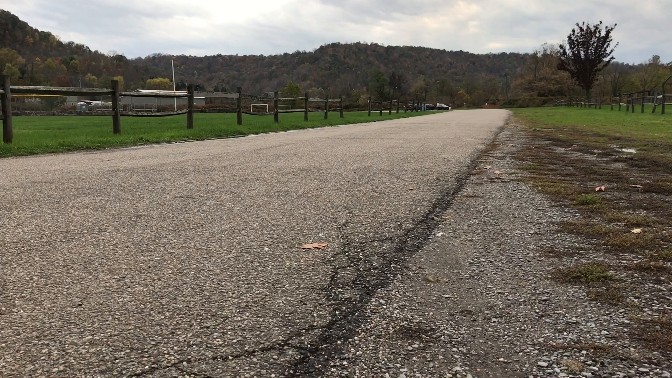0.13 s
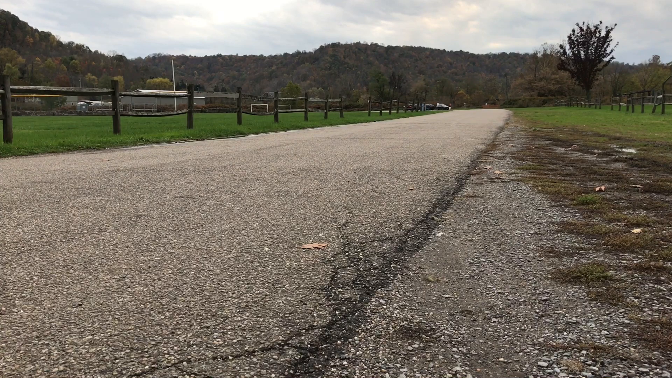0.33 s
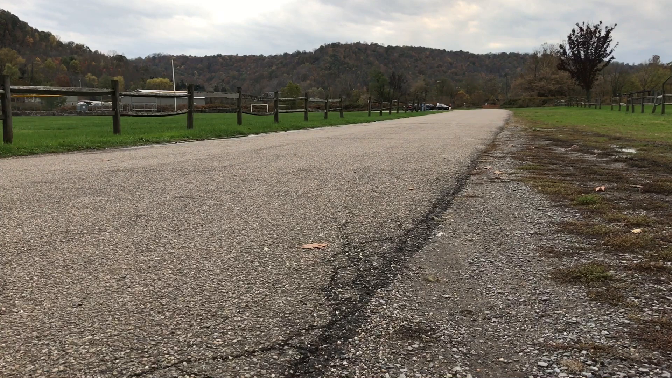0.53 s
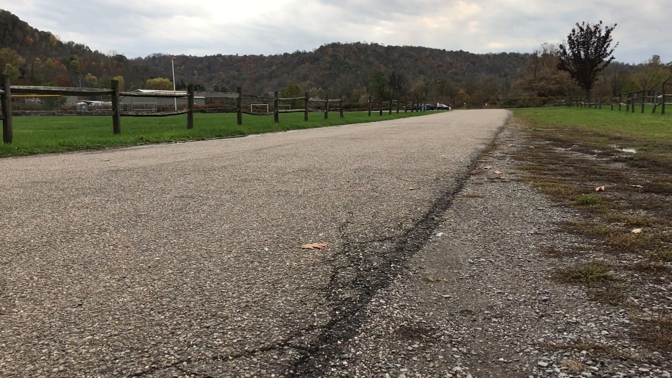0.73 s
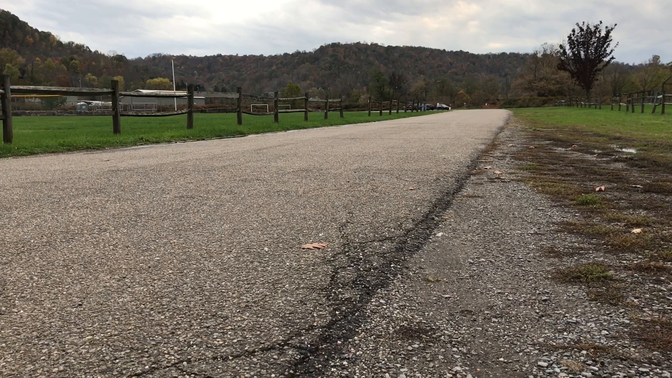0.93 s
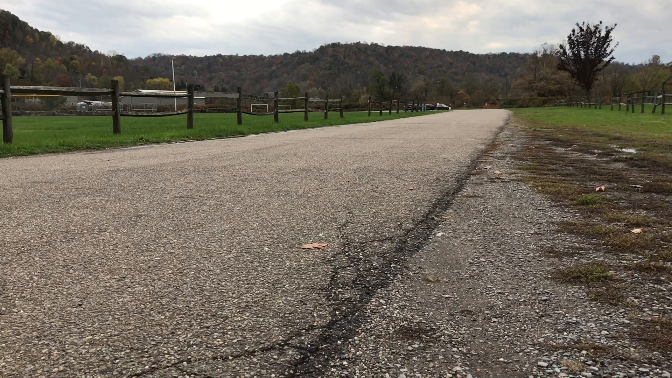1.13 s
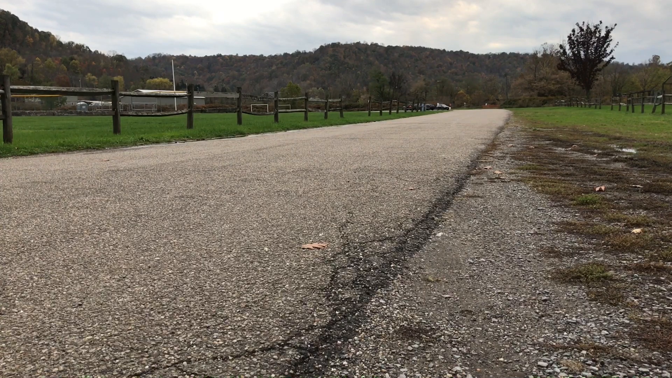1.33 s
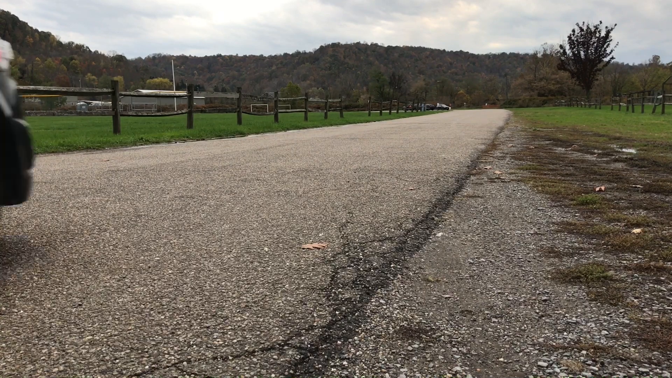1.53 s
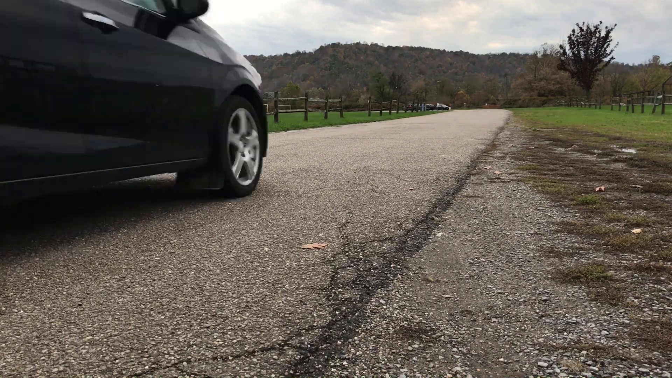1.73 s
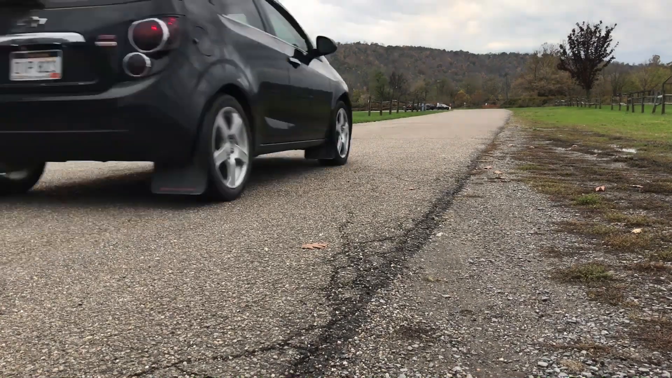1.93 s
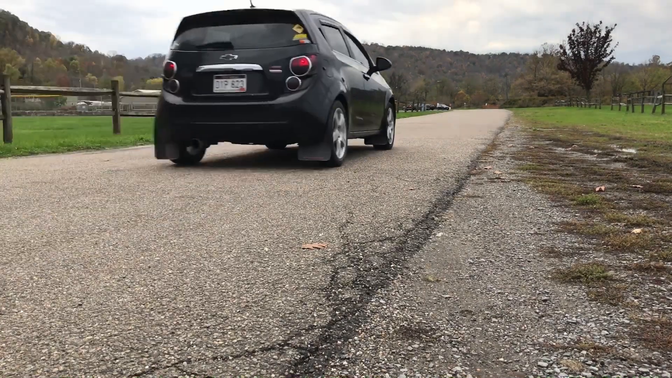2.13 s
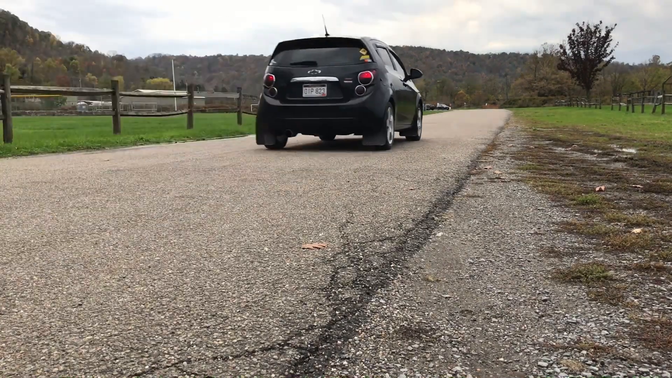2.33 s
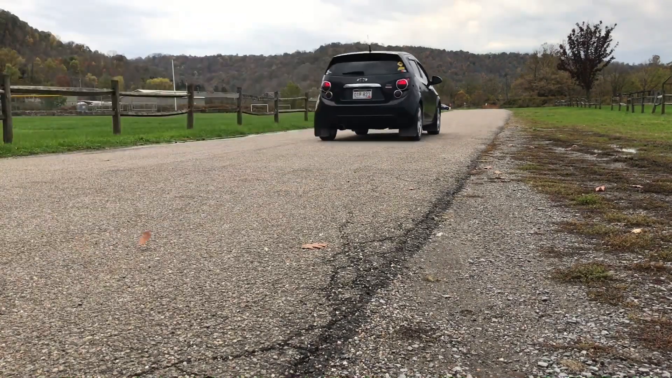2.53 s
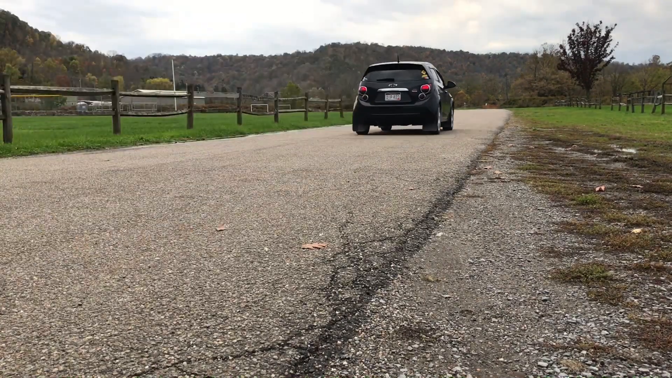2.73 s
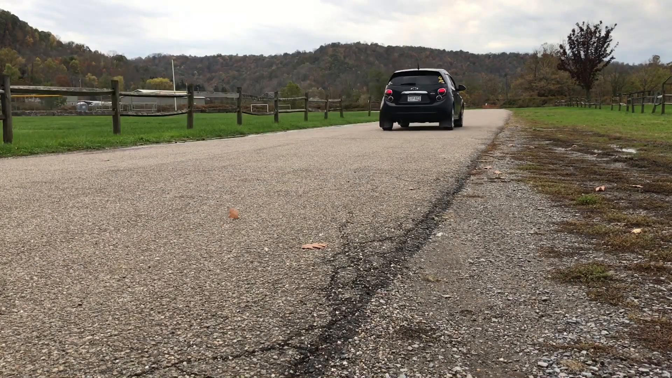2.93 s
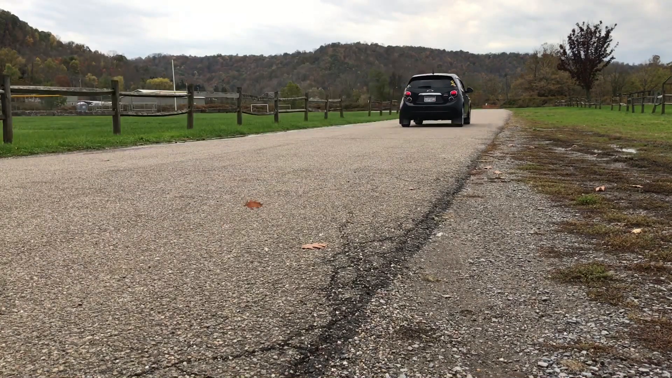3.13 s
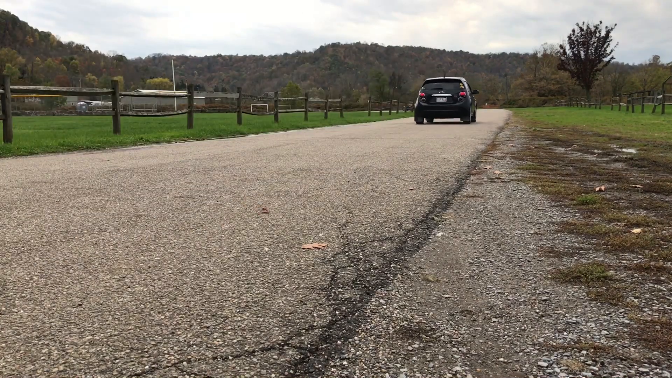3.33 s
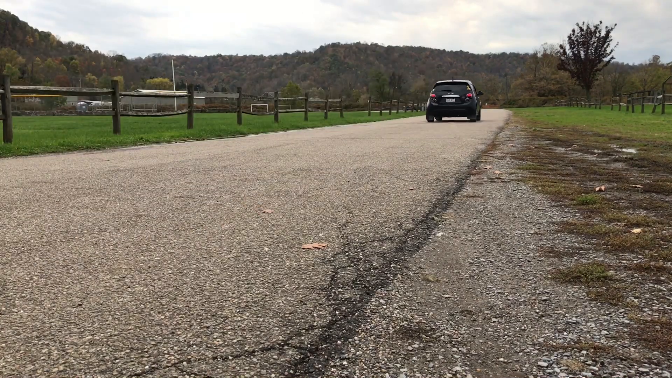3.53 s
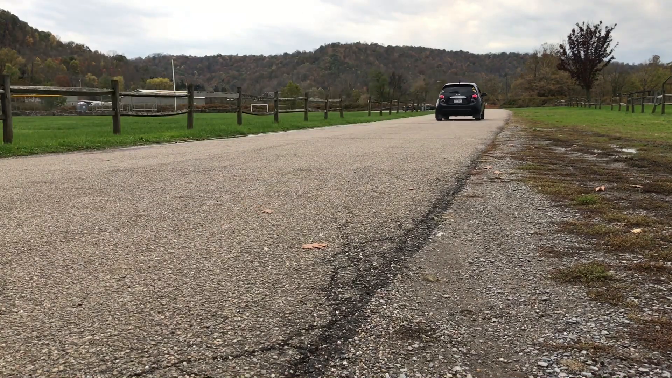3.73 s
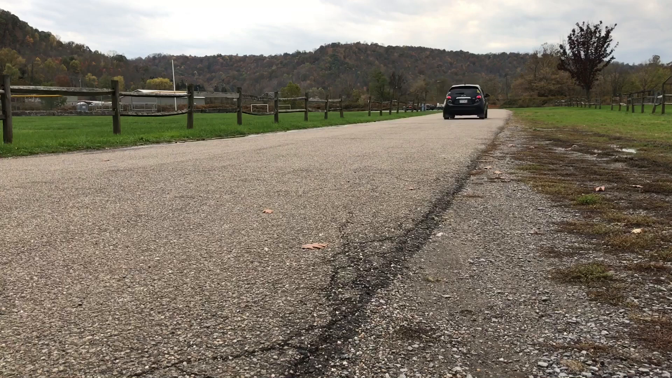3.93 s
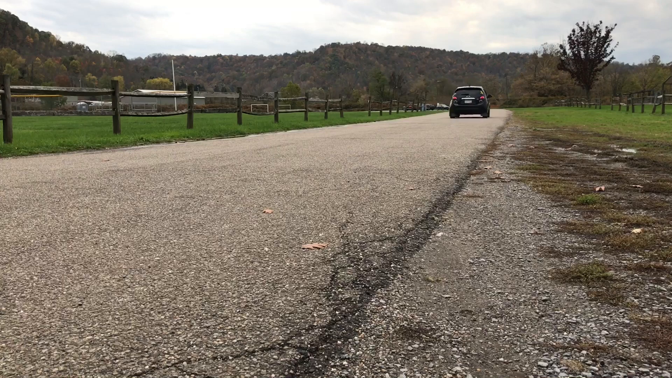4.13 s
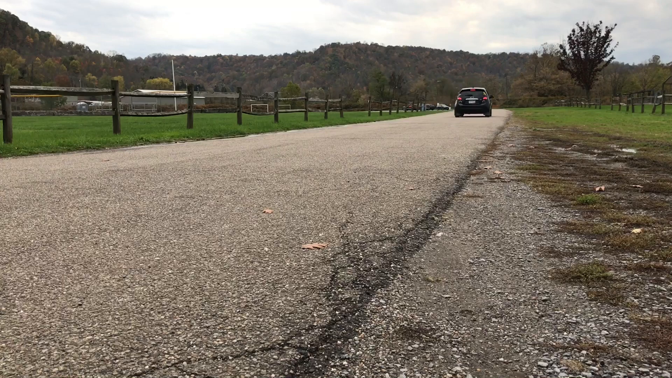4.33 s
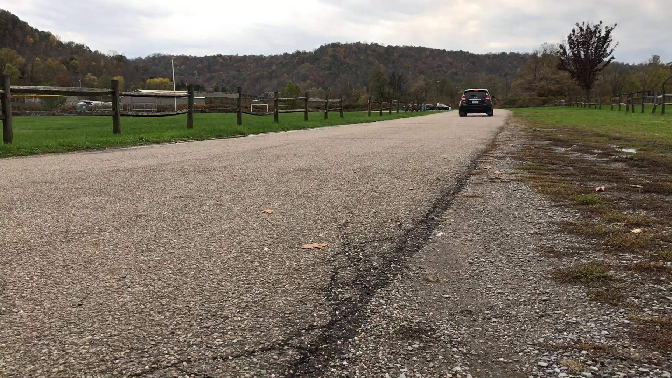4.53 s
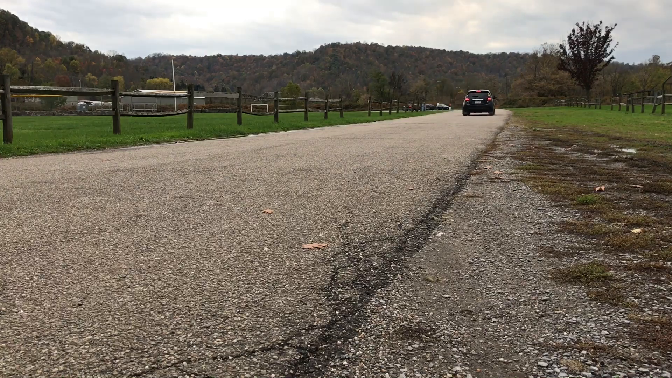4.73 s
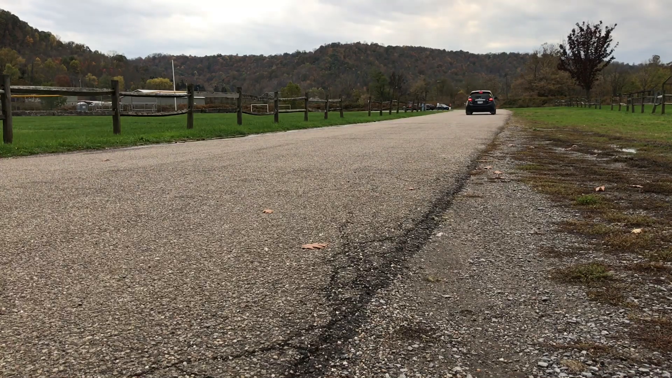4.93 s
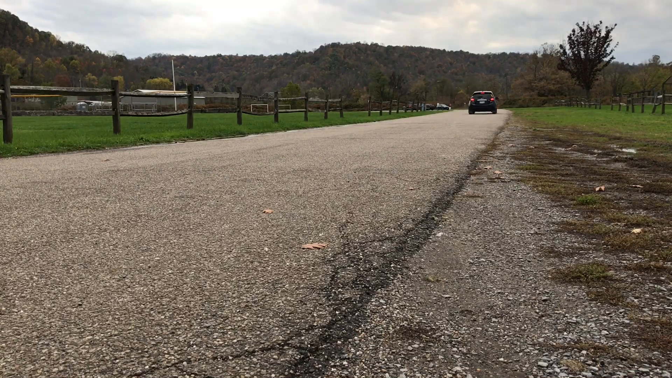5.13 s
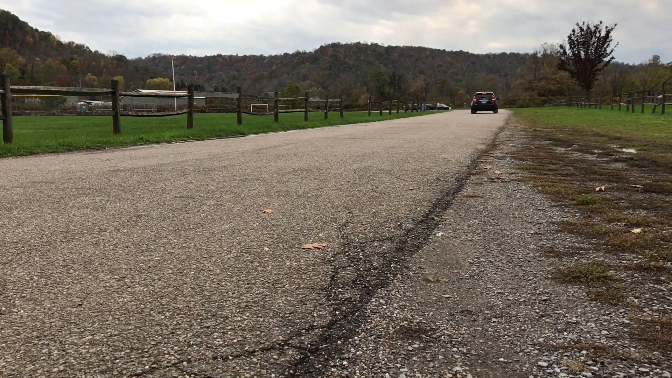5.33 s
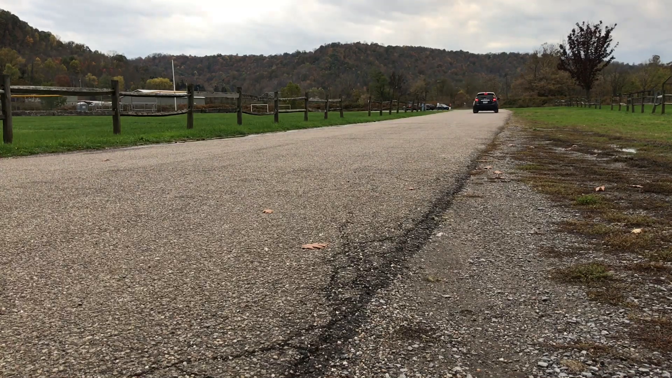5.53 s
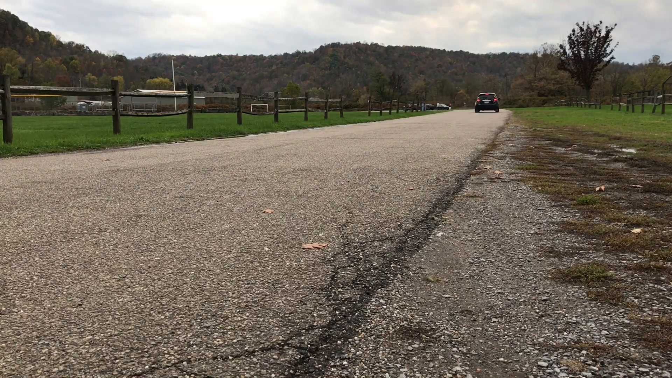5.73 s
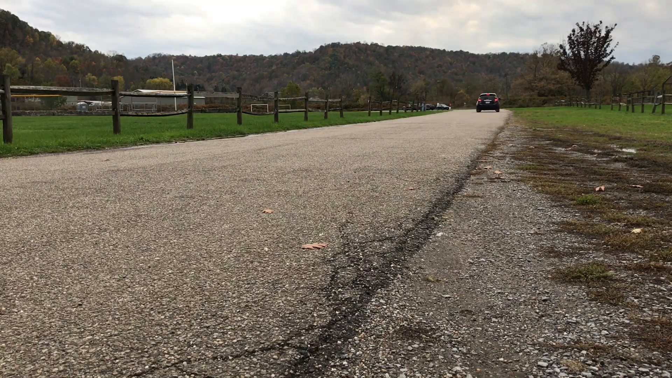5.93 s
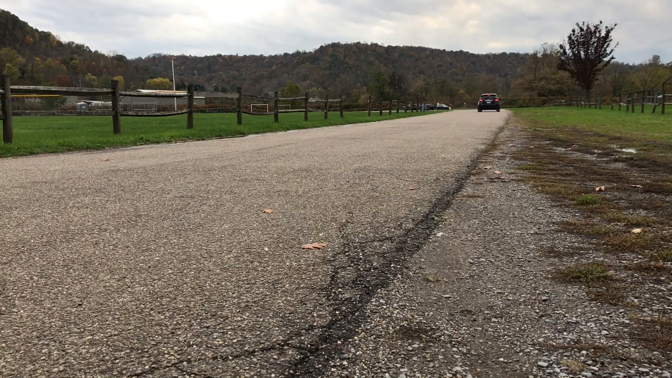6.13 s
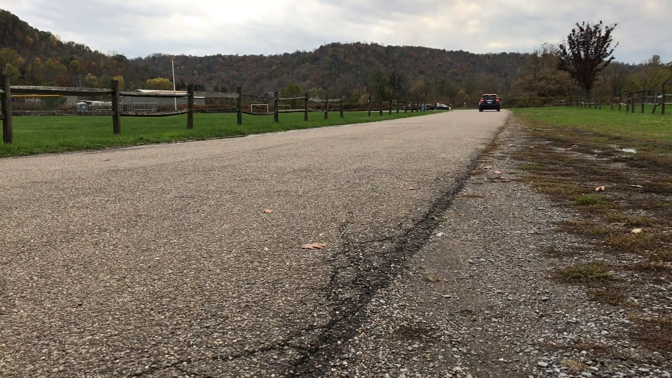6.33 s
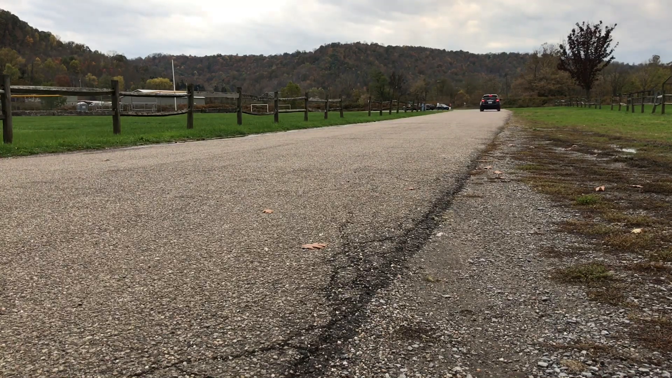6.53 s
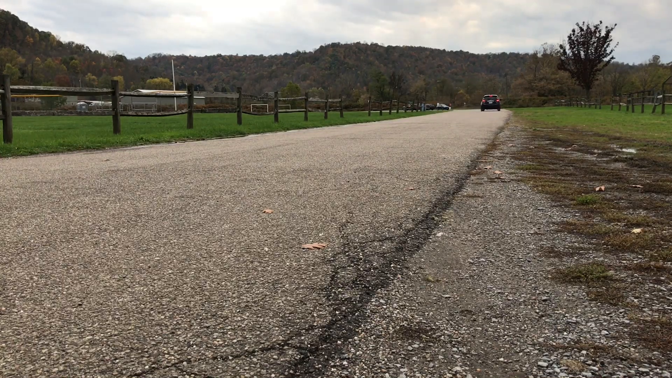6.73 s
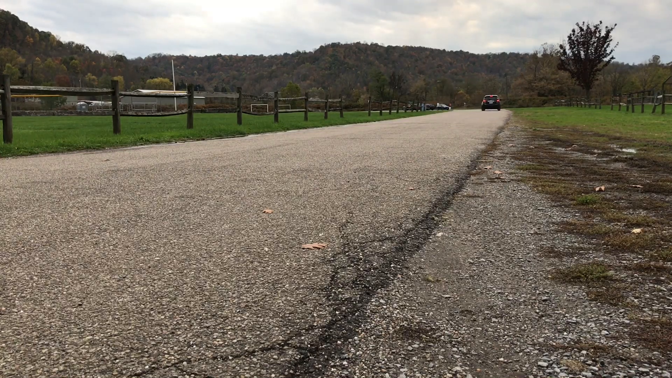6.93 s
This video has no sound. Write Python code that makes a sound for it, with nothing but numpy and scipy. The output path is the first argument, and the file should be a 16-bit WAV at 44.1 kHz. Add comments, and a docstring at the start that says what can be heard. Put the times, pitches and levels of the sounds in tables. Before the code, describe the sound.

Outdoors near the road surface, a small turbocharged car approaches with a buzzing, climbing drone. It sweeps past very close: coarse tyre roar, gas rush, then a ripping, overloaded exhaust rasp from behind. After about a second the driver lifts off and it quietens abruptly. Irregular hollow pops and burbles follow, with a thin descending chirp, then distant engine, fading tyre noise and a few tiny grit ticks.

```python
"""On a quiet country lane a small four-cylinder car nears the microphone, its open exhaust droning in firing orders.
Band noise makes the tyre roar on coarse tarmac, the gas rush, the turbocharger hiss and the ticks of grit beside us.
As the tailpipe swings into view every firing cracks, a sharp front with a puff of noise; the loudest ones clip.
The throttle closes and the cracks die away; the coasting turbine chirps, a falling sine gated by the firings.
Unburnt fuel burbles as damped swings in the pipe, and the car rolls away."""
import sys
import numpy as np
from scipy import signal
from scipy.fft import rfft, irfft, next_fast_len
from scipy.io import wavfile
from scipy.ndimage import uniform_filter1d

SR = 44100
rng = np.random.default_rng(int(sys.argv[2]) if len(sys.argv) > 2 else 0)


def transcribe(u):
    """Save the signal u as a 16-bit wav file named by the first command-line argument.

    u: samples, shape (n,) or (channels, n), limited to [-1, 1]; the rate is SR.
    q: integer samples, one column per channel.
    """
    v = np.clip(np.atleast_2d(u).T, -1, 1)
    q = np.round(v * 32767).astype(np.int16)
    wavfile.write(sys.argv[1], SR, q)


N = 308700  # samples, 7 s
TOP_HZ = 15780  # nothing is kept above this


def amp(db):
    """Gain of a level in dB."""
    return 10 ** (np.asarray(db) / 20)


def unit(x):
    """x at rms 1."""
    return x / np.sqrt(np.mean(x ** 2) + 1e-20)


def along(points, hz):
    """Values at hz from (Hz, value) points joined on a log frequency axis."""
    f, v = np.transpose(points)
    return np.interp(np.log(hz + 1), np.log(f + 1), v)


def curves(rows):
    """One value per sample for each column after the time."""
    s, *columns = np.transpose(rows)
    return [np.interp(np.arange(N) / SR, s, column) for column in columns]


def coloured(x, spectrum):
    """x through a causal minimum-phase filter with the given (Hz, dB) points."""
    m = 2 * next_fast_len(N // 2 + 8192)
    gain = amp(along(spectrum, np.fft.rfftfreq(m, 1 / SR)))
    cepstrum = irfft(np.log(np.maximum(gain, 1e-6)), m)
    # folding the cepstrum onto positive times makes the filter causal
    cepstrum[1:m // 2] *= 2
    cepstrum[m // 2 + 1:] = 0
    return irfft(rfft(x, m) * np.exp(rfft(cepstrum)), m)[:N]


def rush(patchy_db):
    """Turbulence: white noise whose gain varies at random in patches of time and frequency."""
    z = signal.stft(rng.standard_normal(N), nperseg=512)[2]
    field = uniform_filter1d(rng.standard_normal(z.shape), size=6, axis=0)
    field = uniform_filter1d(field, size=10, axis=1)
    return signal.istft(z * amp(patchy_db * unit(field)), nperseg=512)[1][:N]


# Open country around the microphone. Each row: frequency in Hz, relative noise density in dB per Hz.
AIR_SPECTRUM = [(20, -22), (35, -18), (58, -9.5), (80, -6), (110, -9), (300, -29), (1000, -22), (4000, -41),
                (9500, -57), (11000, -65), (16000, -66)]


def country_air():
    """Steady noise of the open air, from first to last."""
    return amp(-52.5) * unit(coloured(rng.standard_normal(N), AIR_SPECTRUM))


# The engine's pace down the lane. Each row: time in seconds, firings a second.
FIRING_RATE = [(0, 57.5), (.84, 64.4), (1.2, 68.3), (1.54, 72.2), (1.99, 73.6), (2.49, 77.6), (2.98, 80.6),
               (3.45, 80.8), (4.1, 77.6), (4.7, 75.6), (5.3, 75.4), (6.1, 72.4), (6.5, 69.8), (7, 67.3)]


def firings():
    """The rate summed to a running firing count per sample, and three random draws for each firing."""
    turn = 2.73 + np.cumsum(curves(FIRING_RATE)[0]) / SR
    chance = rng.standard_normal((int(turn[-1]) + 2, 3))
    return turn, chance


# The drone as the car nears, turns its tailpipe to the microphone and leaves.
# Each row: time in seconds, level in dB, brightness in dB per octave above the firing rate.
DRONE_PASS = [(0, -43, -12), (0.4, -35, -15.5), (0.8, -33.5, -10), (1.1, -31.5, -5.5), (1.35, -31.5, 0.1),
              (1.55, -22, -3.5), (1.75, -15, -1.1), (1.9, -18, 1.2), (2.2, -23, 4), (2.6, -25.5, 3),
              (2.98, -29.5, 5), (3.15, -43, 7.5), (3.38, -46.5, 7), (3.6, -43, 5), (4.1, -44, 1.7),
              (5.25, -50.5, 4.3), (5.4, -54, 1.5), (6, -51.5, 0.5), (7, -51, -9)]
# The exhaust pipe under load. Each row: frequency in Hz, gain in dB.
PIPE_GAIN = [(58, -12.5), (68, -13), (74, 10.9), (82, 5.5), (125, 9.5), (165, 6.5), (205, 17.5), (225, 1.4),
             (245, 7), (290, 10), (310, -0.5), (345, 7.5), (403, 4), (420, -3.5), (445, 1), (485, -16.5)]
# Gain of firing orders 1 to 6 in dB, once the load has died away.
COASTING_DB = [6, 4.5, 3.5, -9, -2.5, -24]
# Strength of each cylinder's firing, in dB.
CYLINDER_DB = [0.24, -0.04, 0.69, -0.95]
# Parts of the drone fade or swell, briefly or for longer, around the given time and frequency.
# Each row: time in seconds, frequency in Hz, depth in dB (below 0 a swell), half width in seconds.
FADES_AND_SWELLS = [(0.58, 187, 13.65, 0.061), (0.85, 129, 11, 0.024), (0.9, 261, 10, 0.059),
                    (1.03, 342, 3, 0.04), (1.07, 204, 18, 0.14), (1.14, 390, 10.53, 0.034),
                    (1.2, 205, 16, 0.048), (1.24, 138, 8.71, 0.053), (1.35, 345, 13, 0.1),
                    (1.37, 287, 23, 0.047), (1.471, 214, 13.5, 0.061), (1.58, 434, 21.97, 0.071),
                    (1.7, 291, 8, 0.063), (1.81, 146, 7.9, 0.094), (1.95, 217, 23, 0.045),
                    (1.95, 394, 35, 0.076), (3.43, 323, 16, 0.088), (3.44, 161, 9.2, 0.053),
                    (3.49, 242, 10, 0.03), (3.26, 239, -6, 0.11), (3.5, 407, 14, 0.11),
                    (4.4, 386, 6.5, 0.99), (5.68, 367, -11.5, 0.25)]
FADE_HALF_WIDTH_HZ = 20
UNLOAD_S, UNLOAD_TAKES_S = 3.37, .08  # the loaded note gives way to the coasting note
TOP_MODE_HZ, TOP_MODE_WIDTH_HZ = 420, 15  # orders above the pipe's top resonance lag
PIPE_LAG_RAD = 2.0


def drone(turn):
    """Six orders of the firing rate resonate in the pipe, sized by the cylinder that fires."""
    cylinder = (turn + .2).astype(int) % len(CYLINDER_DB)
    size = uniform_filter1d(amp(CYLINDER_DB)[cylinder], size=90)
    t, order = np.arange(0, N, 64) / SR, np.arange(1, 7)[:, None]
    hz = order * np.interp(t, *np.transpose(FIRING_RATE))
    s, level_db, bright_db = np.transpose(DRONE_PASS)
    db = np.interp(t, s, level_db) + np.interp(t, s, bright_db) * np.log2(order)
    load = np.clip(1 - (t - UNLOAD_S) / UNLOAD_TAKES_S, 0, 1)
    db = db + load * along(PIPE_GAIN, hz) + (1 - load) * np.c_[COASTING_DB]
    for at, centre_hz, depth_db, half_width_s in FADES_AND_SWELLS:
        off_time = (t - at) / half_width_s
        off_pitch = (hz - centre_hz) / FADE_HALF_WIDTH_HZ
        db = db - depth_db * np.exp(-.5 * off_time ** 2 - .5 * off_pitch ** 2)
    # the lag lets the pipe ring on after the blow
    lag = PIPE_LAG_RAD * (.5 + np.arctan((hz - TOP_MODE_HZ) / TOP_MODE_WIDTH_HZ) / np.pi)
    tone = np.zeros(N)
    for k, order_db, order_lag in zip(order[:, 0], db, lag):
        level = np.interp(np.arange(N) / SR, t, amp(order_db))
        late = np.interp(np.arange(N) / SR, t, order_lag)
        tone += level * np.sin(2 * np.pi * k * turn - late)
    return np.sqrt(2) * size * tone


# Tyre and gas noise at the microphone. Each row: time in seconds, tyre roar in dB, exhaust gas in dB.
ROAR_PASS = [(0, -54, -61), (.95, -47.5, -46), (1.3, -34, -39.5), (1.55, -24.5, -33.5), (1.8, -19, -14.5),
             (2.05, -17, -15.5), (2.4, -27, -16.5), (3.0, -27.5, -31), (3.3, -37.5, -42), (4.1, -35, -41),
             (4.7, -35, -35.5), (5.25, -35, -35), (5.35, -37, -48), (7, -45, -47)]
# Tyres on coarse tarmac. Each row: frequency in Hz, relative noise density in dB per Hz.
TYRE_SPECTRUM = [(25, -40.5), (100, -7.5), (300, -6), (600, -3.5), (850, -7.5), (1150, -6), (1600, -11),
                 (2000, -18), (2800, -29.5), (5000, -49.5), (9000, -70.5), (15500, -72)]
# Gas rushing from the pipe. Each row: frequency in Hz, relative noise density in dB per Hz.
GAS_SPECTRUM = [(53, -26), (90, -22.5), (151, -8), (187, -6.5), (259, -5), (307, 3), (453, -4),
                (504, -16.5), (1190, -21.5), (15500, -67.5)]


def roar(turn):
    """Tyres roar on tarmac, and exhaust gas turbulence swells with each firing."""
    tyre_db, gas_db = curves(ROAR_PASS)
    swell = 1 + 3 * np.exp(-5 * (turn % 1))
    gas = unit(coloured(swell * rush(patchy_db=2.0), GAS_SPECTRUM))
    tyres = unit(coloured(rush(patchy_db=1.0), TYRE_SPECTRUM))
    return amp(tyre_db) * tyres + amp(gas_db) * gas


# Turbocharger hiss from the engine bay as it passes. Each row: time in seconds, level in dB.
HISS_PASS = [(0, -69), (1.1, -58), (1.3, -42), (1.48, -31.5), (1.7, -34), (3.0, -59), (3.5, -64.5),
             (7, -80)]
# Colour of that hiss. Each row: frequency in Hz, relative noise density in dB per Hz.
BAY_SPECTRUM = [(1500, -9.5), (3900, -10.5), (4400, -6.5), (4800, -6.5), (5300, -10), (6200, -10.5),
                (7500, -13.5), (9500, -18), (15800, -35)]


def turbo_hiss():
    """Air rushing through the turbocharger: patchy noise with the colour of the engine bay."""
    return amp(curves(HISS_PASS)[0]) * unit(coloured(rush(patchy_db=2.0), BAY_SPECTRUM))


# Grit and dry leaves tick near the microphone. Each row: start in seconds, starting level in dB,
# centre in Hz, width in octaves, time to fall 60 dB in seconds.
GRIT_TICKS = [(1.183, -24.5, 1240, 0.82, 0.02), (3.628, -60.5, 8450, 0.45, .02),
              (3.711, -54.5, 9950, 2.4, 0.088), (3.722, -53.5, 8850, 1.3, 0.052),
              (3.775, -58, 7850, 1, 0.0082), (4.941, -59.5, 8000, 0.72, 0.018),
              (5.42, -58, 5000, 1.4, .006), (5.499, -44, 2800, 1.5, 0.005), (5.72, -56, 5500, 1.3, .008),
              (5.79, -59, 7500, 0.9, .006), (5.818, -54, 5970, 1.1, 0.0066), (6.177, -37, 2090, 0.3, .015)]


def ticks():
    """Each tick is a dying burst of band noise."""
    out, t = np.zeros(N), np.arange(SR // 10) / SR
    for s, db, hz, octaves, t60 in GRIT_TICKS:
        edges = [hz / 2 ** (octaves / 2), min(hz * 2 ** (octaves / 2), TOP_HZ)]
        band = signal.butter(2, edges, "band", fs=SR, output="sos")
        burst = unit(signal.sosfilt(band, rng.standard_normal(len(t))))
        out[round(s * SR):][:len(t)] += amp(db - 60 * t / t60) * burst
    return out


BEHIND_S, SWING_S = 1.827, 0.28  # tailpipe in view; before that, 20 dB lower for each SWING_S
LIFT_S, CHOKE_S = 2.966, 0.28  # throttle closes; after that, 20 dB lower for each CHOKE_S
BARK_DB, BARK_FADE_DB_PER_S = -14, 8  # level at BEHIND_S
SNAP_S, SNAP_DB, SNAP_FADE_DB_PER_S2 = 2.04, -24.5, 29.5  # level at SNAP_S, falling ever faster either side


def crack_levels():
    """Bark and snap in dB, heard from behind the car while the throttle is open."""
    t = np.arange(N) / SR
    hidden_db = 20 * np.clip(BEHIND_S - t, 0, None) / SWING_S
    hidden_db = hidden_db + 20 * np.clip(t - LIFT_S, 0, None) / CHOKE_S
    bark_db = BARK_DB - BARK_FADE_DB_PER_S * (t - BEHIND_S) - hidden_db
    snap_db = SNAP_DB - SNAP_FADE_DB_PER_S2 * (t - SNAP_S) ** 2 - hidden_db
    return bark_db, snap_db


# Bark of the tailpipe. Each row: frequency in Hz, relative gain in dB.
BARK_COLOUR = [(250, -50.5), (550, 1), (800, 2.5), (1000, 5.5), (1200, 6.5), (1450, -2), (2300, -16),
               (5000, -51)]
# Snap of the shock front. Each row: frequency in Hz, relative gain in dB.
SNAP_COLOUR = [(800, -45), (2000, 7.5), (4000, -6.5), (8000, -19), (12000, -30.5), (16000, -30)]
# Relative strength of each cylinder's crack, in dB.
CRACK_DB = [3.5, -.5, .5, -1.5]


def cracks(turn, chance):
    """A steep front and a puff of gas noise at each firing, heard direct and off the road."""
    turn = turn + .05  # the front arrives in the suck before the swell
    at = np.flatnonzero(np.diff(turn.astype(int)))
    cylinder_db = np.resize(CRACK_DB, len(chance))[turn[at + 1].astype(int)]
    t = np.arange(SR // 100) / SR
    puff_shape = amp(-60 * t / .004) * t * SR / 8
    out = np.zeros(N)
    for level_db, colour, luck in zip(crack_levels(), (BARK_COLOUR, SNAP_COLOUR), chance[:len(at), 1:].T):
        blows = np.zeros(N)
        blows[at] = amp(cylinder_db + 1.6 * np.clip(luck, -1.5, 2))
        blows = blows + 0.26 * np.roll(blows, 50)  # bounce off the road, about 1 ms late
        puff = signal.fftconvolve(blows, puff_shape)[:N] * rng.standard_normal(N)
        out += amp(level_db) * unit(coloured(blows + .2 * puff, colour))
    return out


# The coasting turbine as the car rolls away. Each row: time in seconds, level in dB.
CHIRP_PASS = [(3.75, -84), (3.86, -67.5), (4.1, -57), (4.5, -60.5), (4.73, -50), (4.9, -55), (5.3, -61.5),
              (5.7, -85)]
# Noise that frays its tone. Each row: frequency in Hz, relative gain in dB.
FRAY_SPECTRUM = [(1, 0), (500, -3), (1400, -14), (3500, -45), (20000, -90)]
CHIRP_S, CHIRP_HZ, REST_HZ = 3.86, 5770, 3300  # from CHIRP_S the pitch falls from CHIRP_HZ towards REST_HZ
SLOW_S, FRAY_S = 0.69, .25  # time constant of the fall, and time a full fraying would take


def turbo_chirp(turn, chance):
    """The coasting turbine chirps once a firing, falls as it slows and frays into a noisy band."""
    db, since = curves(CHIRP_PASS)[0], np.clip(np.arange(N) / SR - CHIRP_S, 0, None)
    hz = REST_HZ + (CHIRP_HZ - REST_HZ) * np.exp(-since / SLOW_S)
    fray = np.clip(0.4 + since / FRAY_S, 0, 1)
    blur = unit(coloured(rush(patchy_db=1.5), FRAY_SPECTRUM))
    pulse = np.exp((1.8 - fray) * np.cos(2 * np.pi * turn))
    gate = pulse * amp(2 * fray * chance[(turn + .5).astype(int), 0])
    band = np.sqrt(1 - fray) + np.sqrt(fray) * blur
    return amp(db) * unit(gate * band * np.sin(2 * np.pi * np.cumsum(hz) / SR))


def pings(rows, cycles):
    """Short swings, rows of (s, starting dB, Hz), that start with a suck and fall 60 dB in some cycles."""
    s, db, hz = np.transpose(rows)[:, :, None]
    t = np.arange(SR // 40) / SR
    onset = 1 - np.exp(-t * hz * 6)
    swing = -amp(db - 60 * t * hz / cycles) * np.sin(2 * np.pi * hz * t) * onset
    at = (s * SR).astype(int) + np.arange(len(t))
    return np.bincount(at.ravel(), swing.ravel(), N + SR)[:N]


# Loudest pops in the pipe. Each row: start in seconds, starting level in dB, frequency in Hz.
LOUD_POPS = [(4.179, -20.5, 587), (4.275, -16, 543), (4.369, -22, 640), (4.384, -15.5, 650),
             (4.439, -17, 610), (4.469, -20, 334), (4.532, -16, 640), (4.551, -18, 620), (4.584, -29, 680),
             (4.602, -15.5, 564), (4.647, -16.5, 462), (4.707, -15, 544), (4.742, -13.5, 650),
             (4.76, -13, 646), (4.798, -17.5, 388), (4.856, -17.5, 810), (4.919, -15, 450),
             (4.939, -16.5, 513), (4.956, -16.5, 480), (5.014, -13, 880), (5.026, -16, 700),
             (5.077, -20, 577), (5.131, -16.5, 490), (5.167, -14, 500), (5.22, -17, 730),
             (5.249, -20.5, 546), (6.139, -29, 750), (6.888, -23.5, 700)]
OVERRUN_S, OVERRUN_END_S = 3.9, 5.27  # small burns fall between these times
SIMMER_DB, AFTER_DB, AFTER_FADE_DB_PER_S = -30, -3, 200  # lowest base level; relative to a pop just before


def burble(count):
    """Small random burns of unburnt fuel ring the hot pipe, strongest just after the loud pops."""
    s, db, _ = np.transpose(LOUD_POPS)[:, :, None]
    draw = rng.random((count, 2))
    when = OVERRUN_S + (OVERRUN_END_S - OVERRUN_S) * draw[:, 0]
    after_db = db + AFTER_DB - AFTER_FADE_DB_PER_S * (when - s)
    strongest_db = np.where(when > s, after_db, -99).max(axis=0)
    level_db = np.maximum(strongest_db, SIMMER_DB) + 5 * draw[:, 1]
    hz = 560 * np.exp(.5 * np.clip(rng.standard_normal(count), -2.2, 1))
    small_burns = pings(np.transpose([when, level_db, hz]), cycles=8.6)
    return small_burns + pings(LOUD_POPS, cycles=13.6)


def scene():
    """The car passing the microphone over quiet country air."""
    turn, chance = firings()
    pipe = drone(turn) + cracks(turn, chance) + burble(count=160)
    turbo = turbo_hiss() + turbo_chirp(turn, chance)
    return (country_air() + pipe + roar(turn) + turbo + ticks())[None]


def record(dry):
    """The converter clips near full scale and keeps nothing above its band limit."""
    top = .98
    clipped = dry / (1 + np.abs(dry / top) ** 5) ** (1 / 5)
    return irfft(rfft(clipped) * (np.fft.rfftfreq(N, 1 / SR) < TOP_HZ), N)


dry = scene()
out = record(dry)
transcribe(out)
```